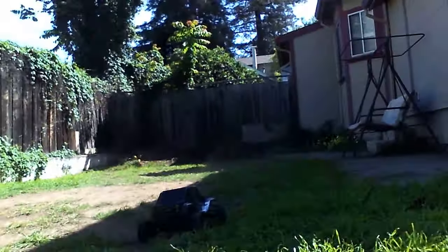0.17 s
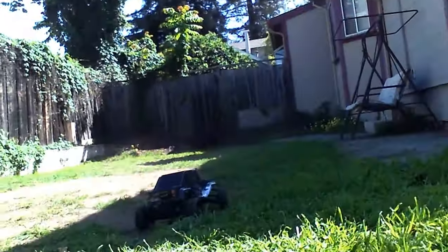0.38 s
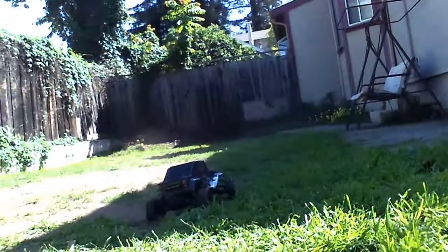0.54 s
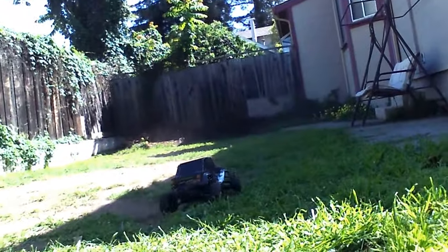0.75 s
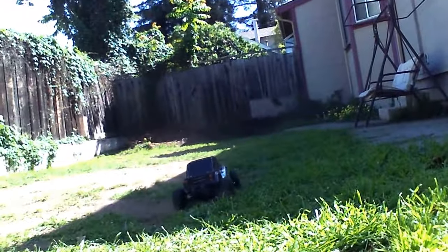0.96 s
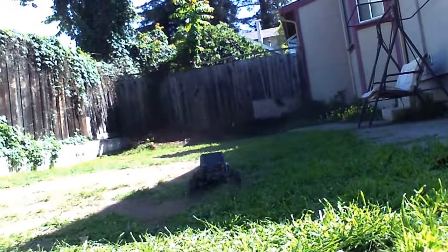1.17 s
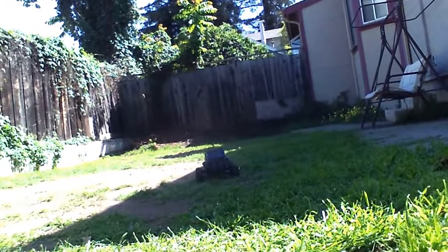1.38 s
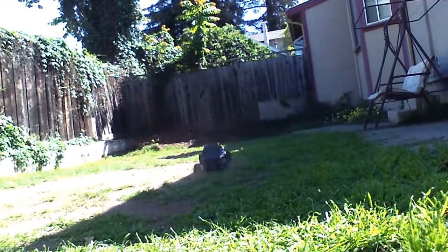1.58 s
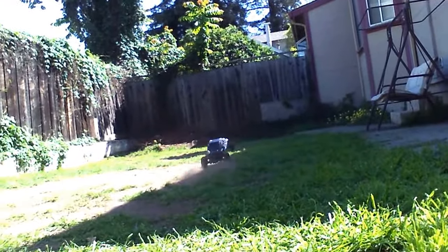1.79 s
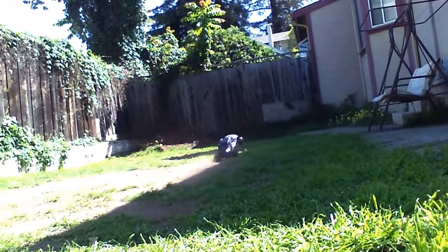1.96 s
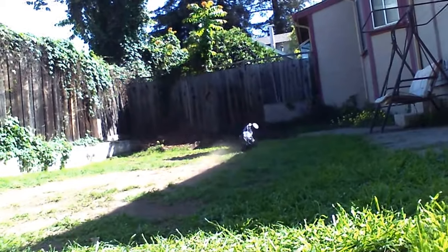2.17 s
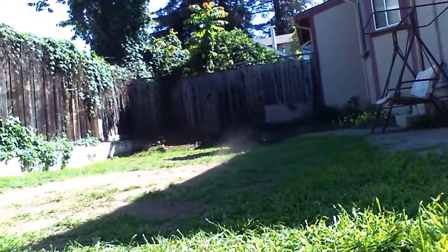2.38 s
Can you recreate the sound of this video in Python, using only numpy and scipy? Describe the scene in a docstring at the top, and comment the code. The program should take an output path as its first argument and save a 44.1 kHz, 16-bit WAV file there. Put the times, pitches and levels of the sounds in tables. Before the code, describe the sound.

A small radio-controlled buggy creeps with faint ticks and rattles, clacks, then bolts away across a lawn with harsh whining gears and gritty tyre noise, easing once before a second burst; wind buffets the outdoor microphone.

```python
"""Radio-controlled buggy on a lawn

A radio-controlled buggy creeps over a lawn, then bolts away in two bursts of throttle.
Gear whine is a set of roughened partials; gear rasp is grains of noise through housing resonances.
Filtered grains make the tyres, and decaying bursts make ticks, rattles, clacks and bumps.
Shaped noise makes gusts and buffets on the microphone; sparse echoes come from the garden fences."""
import sys
import numpy as np
from scipy import signal
from scipy.fft import rfft, irfft, next_fast_len
from scipy.io import wavfile

SR = 44100
rng = np.random.default_rng(int(sys.argv[2]) if len(sys.argv) > 2 else 0)


def log_audio(samples):
    """Write samples as a 16-bit WAV file to the path given in sys.argv[1]."""
    # one column per channel
    frames = np.atleast_2d(samples).T
    # limit to full scale, then quantise
    limited = np.clip(frames, -1, 1)
    pcm = np.round(limited * 32767).astype(np.int16)
    wavfile.write(sys.argv[1], SR, pcm)


N = 107251  # length in samples
TIME = np.arange(N) / SR  # seconds


def amplitude(db):
    """Level law: 20 dB is a factor of ten in amplitude."""
    return 10 ** (np.asarray(db) / 20)


def unit_rms(x):
    """Normalisation: the root mean square becomes 1."""
    return x / np.sqrt(np.mean(x ** 2) + 1e-20)


def white_noise():
    """White noise: independent Gaussian samples have equal power at all frequencies."""
    return rng.standard_normal(N)


def curve(rows, column=1):
    """Linear interpolation: straight lines in time join the values of one table column."""
    rows = np.array(rows)
    return np.interp(TIME, rows[:, 0], rows[:, column])


def random_walk(hz):
    """Band-limited chance: a Gaussian low-pass smooths noise into a wander of unit RMS."""
    size = next_fast_len(N, real=True)
    frequency = np.arange(size // 2 + 1) * SR / size
    spectrum = rfft(white_noise(), size) * np.exp(-(frequency / hz) ** 2)
    return unit_rms(irfft(spectrum, size)[:N])


def colour(x, points):
    """Minimum-phase filtering: a folded cepstrum gives a causal filter through (Hz, dB) points."""
    hz, db = np.array(points).T
    size = 4096
    octave = np.log2(np.maximum(np.arange(size + 1) * SR / (2 * size), 1))
    outside = np.abs(octave - np.clip(octave, np.log2(hz[0]), np.log2(hz[-1])))
    # 24 dB per octave beyond the end points; unit power overall
    gain = unit_rms(amplitude(np.interp(octave, np.log2(hz), db) - 24 * outside))
    cepstrum = irfft(np.log(gain))
    cepstrum[1:size] *= 2
    cepstrum[size + 1:] = 0
    impulse_response = irfft(np.exp(rfft(cepstrum)))
    return signal.fftconvolve(x, impulse_response)[:N]


def resonate(x, modes):
    """Modal superposition: parallel resonances (Hz, width in Hz, dB) add their responses."""
    total = 0
    for hz, width, db in modes:
        b, a = signal.iirpeak(hz, hz / width, fs=SR)
        total = total + amplitude(db) * signal.lfilter(b, a, x)
    return total


def grains(per_s, spread_db):
    """Shot noise: random tiny impacts of uneven size and either sign."""
    size = amplitude(spread_db * np.minimum(rng.exponential(size=N), 4))
    return unit_rms((rng.random(N) < per_s / SR) * size * np.sign(white_noise()))


def burst(start, db, decay_s):
    """Exponential decay: noise starts at once, as in a sudden contact, and dies away."""
    age = TIME - start
    return amplitude(db) * (age >= 0) * np.exp(-np.abs(age) / decay_s) * white_noise()


# Wind levels before trim. Each row: time in seconds, rumble level in dB, flutter level in dB.
WIND_LEVELS = [(0, -40, -56.5), (.5, -40.5, -68), (.6, -34, -63), (.8, -38.5, -66), (.83, -25, -38.5),
               (.87, -23, -33.5), (.93, -37, -50), (1.01, -26.5, -42), (1.05, -29.5, -36), (1.11, -33, -50),
               (1.145, -29.5, -35.5), (1.2, -19.5, -33.5), (1.23, -33, -51), (1.36, -30.5, -52),
               (1.45, -37, -66), (1.54, -31.5, -59), (1.58, -24.5, -47.5), (1.67, -24, -30),
               (1.7, -18.5, -23.5), (1.75, -24, -27.5), (1.83, -22.5, -28.5), (1.88, -19.5, -28),
               (2.0, -23, -31), (2.05, -28, -39.5), (2.15, -27.5, -39), (2.22, -32, -36.5),
               (2.27, -22.5, -36), (2.3, -35, -56), (2.43, -32, -50)]
# Spectra of rumble and flutter. Each row: frequency in Hz, relative spectral density in dB.
RUMBLE_SPECTRUM = [(22, -3.5), (35, 3), (58, 3.5), (80, -2.5), (115, -.5), (175, -5.5), (215, -11.5),
                   (260, -15)]
FLUTTER_SPECTRUM = [(90, -26), (170, -5.5), (280, 4.5), (450, -2.5), (800, -12.5), (1300, -30.5),
                    (2500, -46.5)]


def wind(eddy_db):
    """Turbulent pressure noise: gusts rumble on the microphone, strong ones flutter in eddies."""
    rumble_trim_db, flutter_trim_db = -0.5, -2.5
    rumble = unit_rms(colour(white_noise(), RUMBLE_SPECTRUM))
    eddies = white_noise() * amplitude(eddy_db * random_walk(100))
    flutter = unit_rms(colour(eddies, FLUTTER_SPECTRUM))
    rumble_gain = amplitude(curve(WIND_LEVELS, column=1) + rumble_trim_db)
    flutter_gain = amplitude(curve(WIND_LEVELS, column=2) + flutter_trim_db)
    return rumble * rumble_gain + flutter * flutter_gain


# Spectrum of the steady air noise. Each row: frequency in Hz, relative spectral density in dB.
AIR_SPECTRUM = [(120, -38.5), (200, -7.5), (738, -15.5), (1800, -17.5), (7090, -19.5), (7800, -21.5),
                (9000, -52)]


def air(level_db):
    """Stationary noise: a steady faint hiss with a fixed spectrum."""
    return amplitude(level_db) * colour(white_noise(), AIR_SPECTRUM)


# Common level of tyres and chassis before trim. Each row: time in seconds, level in dB.
TYRE_LEVELS = [(.1, -54.5), (.3, -50.5), (.42, -61.5), (.57, -55), (.66, -46.5), (.76, -47.5), (.81, -57),
               (.893, -52), (.907, -46), (1.0, -33.5), (1.17, -38), (1.24, -48), (1.3, -45), (1.39, -56.5),
               (1.44, -43.5), (1.7, -40.5), (1.87, -42), (2.1, -45), (2.43, -50)]
# Spectrum of the tyre noise. Each row: frequency in Hz, relative spectral density in dB.
TYRE_SPECTRUM = [(400, -1.5), (900, -0.5), (1250, -5), (1600, -7), (2200, -14), (2800, -10.5),
                 (3250, -14.5), (3700, -10.5), (6000, -11.5)]
# Resonances of the plastic body. Each row: frequency in Hz, width in Hz, relative level in dB.
BODY_MODES = [(683, 26, -3), (1510, 340, -8.5), (2060, 230, -7)]


def tyres(patchy_db):
    """Impact excitation: treads tear at grass and grit and shake the resonant plastic body."""
    tread_trim_db, body_trim_db = -3.5, -8.5
    grit = unit_rms(grains(3500, 2.5) * amplitude(patchy_db * random_walk(27)))
    tread = amplitude(tread_trim_db) * colour(grit, TYRE_SPECTRUM)
    body = amplitude(body_trim_db) * unit_rms(resonate(grains(3000, 2.6), BODY_MODES))
    return amplitude(curve(TYRE_LEVELS)) * (tread + body)


# Dry ticks close to the microphone. Each row: start in seconds, level in dB.
TICK_EVENTS = [(0.1993, -36.5), (.3195, -28), (0.3636, -25.5), (2.325, -35)]
# Spectrum of the ticks. Each row: frequency in Hz, relative spectral density in dB.
TICK_SPECTRUM = [(300, -30), (900, 2.5), (2000, -14), (4600, 4.5), (6000, 3.5), (8500, -17)]


def ticks(decay_s):
    """Transient spectrum: very short noise bursts sound as dry ticks nearby."""
    contacts = sum(burst(start, db, decay_s) for start, db in TICK_EVENTS)
    return colour(contacts, TICK_SPECTRUM)


# Knocks of the chassis over bumps. Each row: start in seconds, level in dB, ring frequency in Hz.
BUMP_EVENTS = [(.499, -39.5, 1380), (.506, -44, 950), (.679, -39, 1120), (0.696, -42.5, 1080),
               (.716, -37.5, 890), (0.747, -40.5, 1260)]


def bumps(decay_s, crack_db):
    """Damped free vibration: each bump gives a dull crack and a short hollow ring."""
    total = 0
    for start, db, hz in BUMP_EVENTS:
        age = TIME - start
        envelope = amplitude(db) * (age >= 0) * np.exp(-np.abs(age) / decay_s)
        hollow_ring = envelope * np.sin(2 * np.pi * hz * age)
        crack = colour(burst(start, db + crack_db, decay_s), [(700, 4.5), (2200, -1), (7000, -11)])
        total = total + hollow_ring + crack
    return total


# Drivetrain rattles at low throttle. Each row: start in seconds, level in dB, decay in seconds.
RATTLE_EVENTS = [(0.599, -38, 0.0077), (0.6287, -32.5, 0.0041), (0.641, -40.5, 0.0043),
                 (0.6618, -34.5, 0.0034), (.678, -40, 0.0034), (0.7272, -33.5, 0.0075), (.753, -37, 0.008),
                 (0.7808, -37.5, 0.0035), (1.192, -33, 0.009), (1.217, -36, 0.0053), (1.248, -43, .005),
                 (1.291, -34, 0.0073), (2.235, -35.5, 0.0059)]
# Spectrum of the rattles. Each row: frequency in Hz, relative spectral density in dB.
RATTLE_SPECTRUM = [(300, -1), (900, 10), (1400, -1), (2100, 9.5), (3200, 0), (5500, -1.5), (7400, 9),
                   (8600, -6.5)]


def rattles():
    """Repeated impact: loose gears strike one another in decaying bursts."""
    return colour(sum(burst(*row) for row in RATTLE_EVENTS), RATTLE_SPECTRUM)


# Sharp buffets of wind. Each row: time in seconds, level before trim in dB, length in seconds.
BUFFET_EVENTS = [(0.609, -33.5, 0.0033), (1.003, -24, 0.0068), (1.148, -22, 0.0044), (1.604, -25, 0.0022),
                 (1.698, -16, 0.0028), (1.711, -19, 0.0046), (1.823, -19.5, 0.0036), (1.843, -21.5, 0.0014),
                 (1.871, -17, 0.0034), (1.91, -23, 0.0047), (1.958, -26, 0.0079), (1.996, -19, 0.0033),
                 (2.123, -28.5, 0.0068), (2.166, -27, 0.0064), (2.254, -24, 0.0039)]
# Spectrum of the buffets. Each row: frequency in Hz, relative spectral density in dB.
BUFFET_SPECTRUM = [(50, -10), (170, 0.5), (300, -3), (500, -8.5), (900, -20.5), (1500, -40), (3000, -45.5)]


def buffets(push_db, swirl_db):
    """Impulsive pressure: a single eddy gives a sudden push inside a short swirl of noise."""
    push, swirl_envelope = np.zeros(N), np.zeros(N)
    for at, db, length in BUFFET_EVENTS:
        push[int(at * SR)] += amplitude(db) * np.sqrt(length * SR)
        swirl_envelope += amplitude(db) * np.exp(-((TIME - at) / length) ** 2)
    swirl = white_noise() * swirl_envelope
    return colour(amplitude(push_db) * push + amplitude(swirl_db) * swirl, BUFFET_SPECTRUM)


# Motor speed as gear whine pitch, before jitter. Each row: time in seconds, pitch in Hz.
WHINE_PITCH = [(.9, 1439), (.925, 1645), (.937, 2487), (.965, 3935), (.974, 2515), (1.003, 3204),
               (1.04, 3400), (1.08, 3650), (1.115, 3710), (1.16, 3510), (1.2, 3422), (1.297, 3133),
               (1.335, 1711), (1.415, 1952), (1.435, 2536), (1.465, 3905), (1.472, 2234), (1.487, 2543),
               (1.499, 3156), (1.57, 3135), (1.63, 3620), (1.69, 3535), (1.79, 3812), (1.87, 3745),
               (1.97, 4497), (2.005, 4485), (2.028, 3285), (2.055, 3054), (2.08, 3593), (2.14, 4626),
               (2.43, 4690)]
# Whine level before strands and ringing. Each row: time in seconds, fundamental in dB, octave in dB.
WHINE_LEVELS = [(.88, -100, -100), (.905, -37.5, -51), (.94, -38, -52.5), (.965, -51, -61),
                (.982, -38, -54), (1.005, -45.5, -40.5), (1.11, -43.5, -39.5), (1.165, -42.5, -46),
                (1.21, -72, -46), (1.27, -74, -79), (1.314, -43.5, -56), (1.335, -70, -76),
                (1.405, -63, -73), (1.435, -37, -37.5), (1.462, -59, -49), (1.469, -59, -66),
                (1.478, -46, -48), (1.505, -55, -34.5), (1.57, -57.5, -38), (1.63, -61, -49),
                (1.715, -50, -44.5), (1.85, -47.5, -44), (1.97, -49.5, -66), (2.02, -49, -52.5),
                (2.055, -56, -43), (2.12, -52, -73), (2.19, -48.5, -81), (2.43, -68, -96)]
# Roughness, smearing the whine as the buggy bounces off. Each row: time in seconds, roughness 0-1.
WHINE_ROUGHNESS = [(.98, .97), (1.06, .42), (1.43, .8), (1.5, .8), (1.7, .65), (1.8, .93)]
# Strands set beside the whine by uneven mesh. Each row: share of whine pitch, relative level in dB.
MESH_STRANDS = [(1.08, -9.5), (.94, -17.5)]
# Common level of the gear rasp before trim. Each row: time in seconds, level in dB.
RASP_LEVELS = [(.5, -72), (.885, -58.5), (.91, -45), (.955, -35.5), (.985, -37), (1.05, -30), (1.11, -26.5),
               (1.2, -29), (1.24, -49), (1.252, -32.5), (1.295, -50), (1.335, -48), (1.4, -54),
               (1.45, -37.5), (1.485, -47.5), (1.5, -36.5), (1.7, -34.5), (1.79, -35.5), (1.9, -32.5),
               (2.0, -42.5), (2.08, -38), (2.11, -42.5), (2.43, -50)]
# Resonances of motor and housing. Each row: frequency in Hz, width in Hz, relative level in dB.
HOUSING_MODES = [(7305, 390, 8), (6700, 440, -3.5)]


def gears(jitter, scrape_width_hz, chatter_db, eccentric, throb_db):
    """Gear-mesh modulation: teeth whine and scrape, uneven on every turn, and ring the housing."""
    teeth = 33  # whine cycles per turn of the large gear
    blur_hz = 240  # at the fundamental
    ring_db, rasp_trim_db, scrape_trim_db = 2.5, -2.5, -8.5
    low_stage_share, low_stage_db = .48, -18.5  # slower second stage: share of whine pitch, trim
    pitch = curve(WHINE_PITCH) * (1 + jitter * random_walk(93))
    phase = 2 * np.pi * np.cumsum(pitch) / SR
    turn_harmonics = sum(np.cos(k * phase / teeth + 2 * np.pi * rng.random()) / np.sqrt(k)
                         for k in range(1, 8))
    runout = unit_rms(turn_harmonics)
    rough = np.clip(curve(WHINE_ROUGHNESS), 0, 1)

    def partial(multiple):
        """Narrow-band modulation: one roughened line follows the motor speed."""
        blur = blur_hz * np.sqrt(multiple)
        random_swing = (random_walk(blur) + 1j * random_walk(blur)) / np.sqrt(2)
        swing = np.sqrt(1 - rough ** 2) + rough * random_swing
        return np.real(swing * np.exp(1j * multiple * phase)) * (1 + eccentric * runout)

    whine = 0
    for k in (1, 2):  # fundamental and octave
        strands = sum(amplitude(db) * partial(k * share) for share, db in MESH_STRANDS)
        whine = whine + amplitude(curve(WHINE_LEVELS, column=k)) * (partial(k) + strands)
    ringing = amplitude(ring_db) * resonate(whine, HOUSING_MODES)

    # rasp and scrape throb with the large gear
    chatter = unit_rms(amplitude(chatter_db * random_walk(82) + throb_db * runout))
    housing_noise = resonate(grains(3000, 0.59) * chatter, HOUSING_MODES)
    rasp = unit_rms(resonate(housing_noise, [(7440, 1600, 0)]))
    smeared_octave = np.sin(2 * phase) * random_walk(scrape_width_hz)
    scrape = resonate(smeared_octave * chatter, [(6840, 1200, 0.005)])
    grind = amplitude(rasp_trim_db) * rasp + amplitude(scrape_trim_db) * scrape
    grind = grind + amplitude(low_stage_db) * partial(low_stage_share)
    return whine + ringing + amplitude(curve(RASP_LEVELS)) * grind


# Gears taking up their slack. Each row: start in seconds, level in dB, decay in seconds.
CLACK_EVENTS = [(0.887, -39.5, 0.011), (0.8976, -20.5, 0.0035), (0.9025, -29.5, .006)]
# Spectrum of the clacks. Each row: frequency in Hz, relative spectral density in dB.
CLACK_SPECTRUM = [(300, -21), (900, 3.5), (1500, 0.5), (2800, 4), (3800, 2), (4600, -6), (5500, 6.5),
                  (6500, -4.5), (8500, -25)]


def clacks():
    """Backlash impact: gears take up their slack and clack as the throttle opens."""
    return colour(sum(burst(*row) for row in CLACK_EVENTS), CLACK_SPECTRUM)


# Hums of the loaded body. Each row: start in seconds, length in seconds, centre pitch in Hz,
# mean amplitude in dB.
HUM_EVENTS = [(1.12, 0.065, 900, -42), (1.0, 0.21, 1630, -47.5), (1.49, 0.1, 715, -43),
              (1.495, 0.12, 1570, -47.5)]


def hums(fade_s):
    """Frequency and amplitude modulation: the plastic body hums unsteadily under load."""
    waver = .03  # RMS share of the pitch
    total = 0
    for start, length, hz, db in HUM_EVENTS:
        fade = np.clip(np.minimum(TIME - start, start + length - TIME) / fade_s, 0, 1)
        envelope = amplitude(db) * fade * (1 + 0.4 * random_walk(80))
        phase = 2 * np.pi * np.cumsum(hz * (1 + waver * random_walk(134))) / SR
        total = total + envelope * np.sin(phase)
    return total


def yard(x):
    """Diffuse reflection: sparse echoes from the fences and the house decay exponentially."""
    echo_db, decay_s, first_echo_s = -14, 0.054, .012
    echo = grains(830, 5.4) * np.exp(-TIME / decay_s) * (TIME > first_echo_s)
    echo = echo / np.linalg.norm(echo)
    return x + amplitude(echo_db) * signal.fftconvolve(x, echo)[:N]


def scene():
    """Superposition: the buggy and its echoes add to the ticks, wind and air."""
    drive = gears(jitter=0.00774, scrape_width_hz=1100, chatter_db=1.5, eccentric=0.22, throb_db=-5.0)
    knocks = bumps(decay_s=0.0052, crack_db=-2) + rattles() + clacks()
    buggy = tyres(patchy_db=2.0) + knocks + drive + hums(fade_s=0.0092)
    gusts = wind(eddy_db=4.5) + buffets(push_db=-3.5, swirl_db=-3.5)
    mix = yard(buggy) + ticks(decay_s=0.00084) + gusts + air(level_db=-54.5)
    return mix[None]


def record(dry):
    """Elliptic low-pass: a steep cut removes the treble above 8650 Hz."""
    low_pass = signal.ellip(10, .2, 80, 8650, fs=SR, output="sos")  # ripple and stop depth in dB
    return signal.sosfilt(low_pass, dry)


dry = scene()
out = record(dry)
log_audio(out)
```